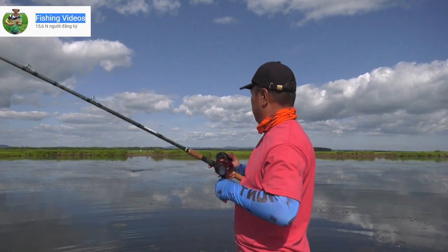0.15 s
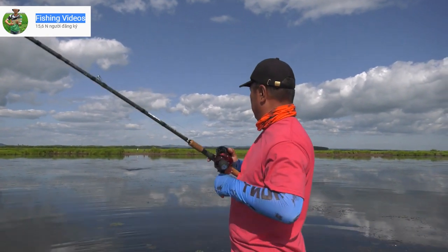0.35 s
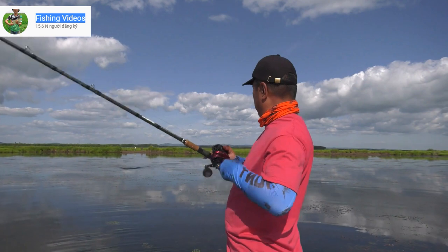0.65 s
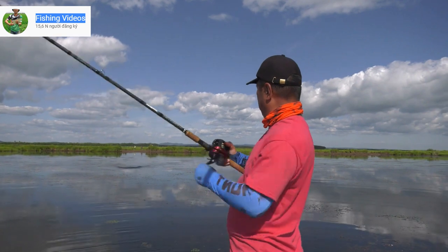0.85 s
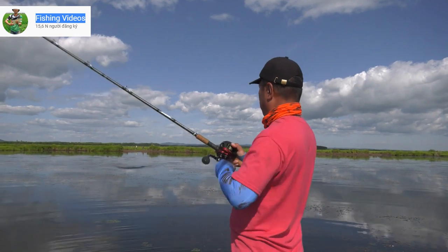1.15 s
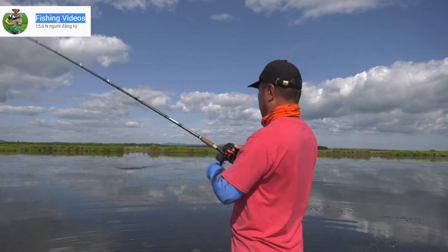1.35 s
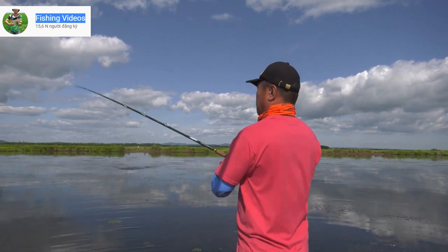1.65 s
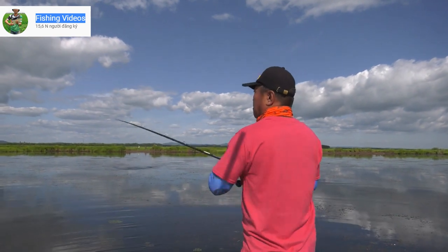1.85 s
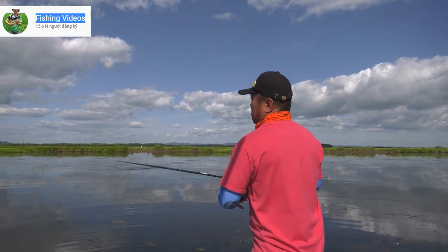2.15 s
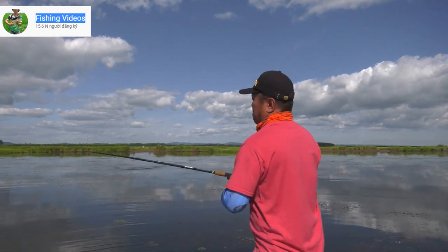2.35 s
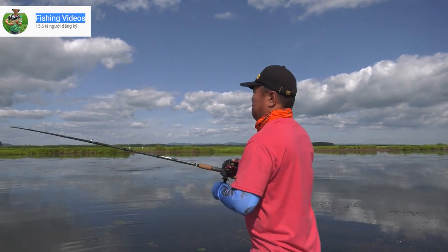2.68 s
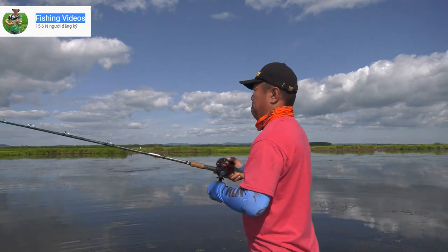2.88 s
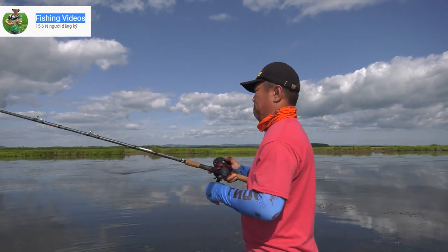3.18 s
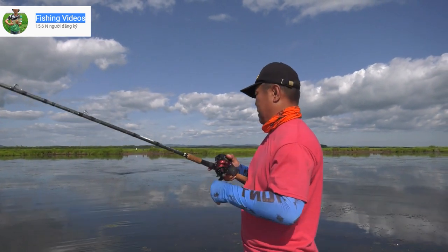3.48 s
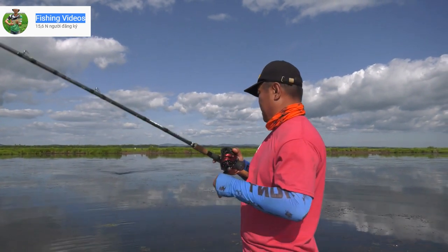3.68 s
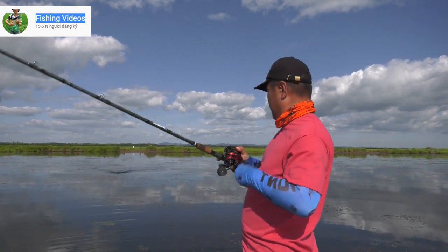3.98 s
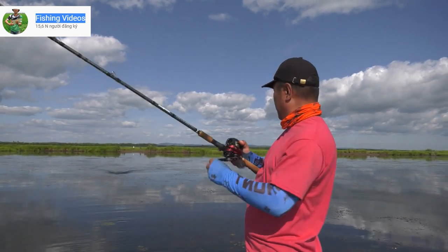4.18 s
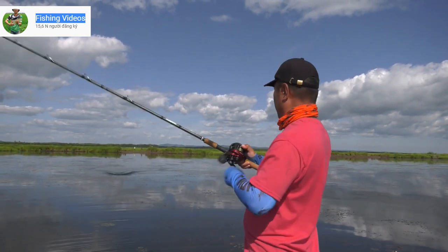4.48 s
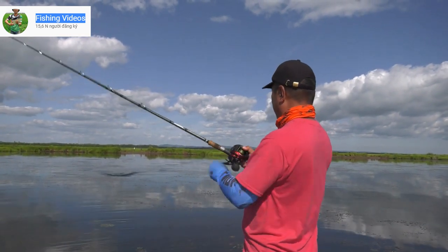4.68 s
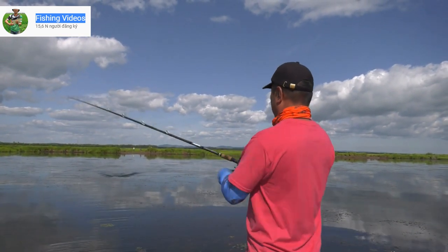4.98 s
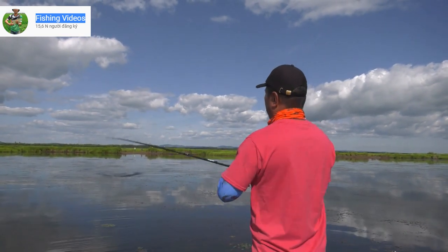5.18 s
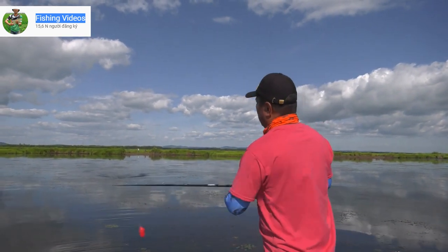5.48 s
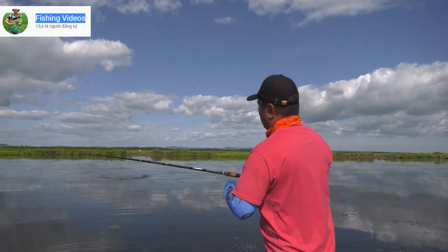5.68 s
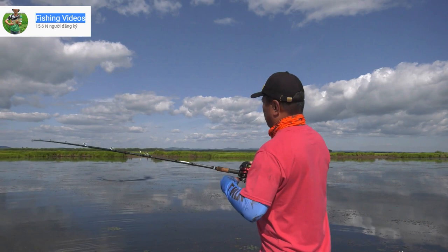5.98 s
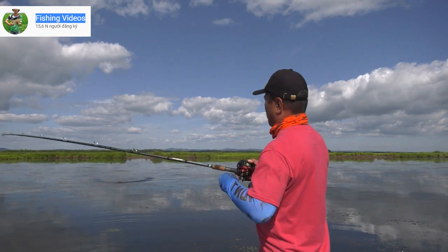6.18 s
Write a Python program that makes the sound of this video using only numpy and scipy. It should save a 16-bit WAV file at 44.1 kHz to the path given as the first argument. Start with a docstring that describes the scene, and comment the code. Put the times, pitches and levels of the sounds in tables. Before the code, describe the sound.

An angler's reel whirs in two short spells of quick handle pulls, each a grainy hiss with metallic clicks and thin line squeaks. Around them a pole bumps and rubs on a hollow wooden hull: a busy cluster first, a lighter patter midway, a sharp thump late. Quiet open water outdoors, faint airy wash, near sounds picked up closely with only a tiny short echo.

```python
"""Pole and fishing reel on a small boat

A small boat lies on still, open water. A wooden pole rubs and knocks on the hollow hull: slips and blows
set its wooden modes ringing. A fishing reel is wound mainly in two spells: each pull of the handle hisses
through guides and gears, made of grit noise and resonances. Ticks and squeaks are narrow bands of noise,
the ticks with a bright snap on top. A low wash of air and water, made of random spectra, lies under it all,
and the near sounds echo briefly.
"""
import sys
import numpy as np
from scipy import signal
from scipy.fft import rfft, irfft, next_fast_len
from scipy.io import wavfile
from scipy.ndimage import uniform_filter1d

SR = 44100
rng = np.random.default_rng(int(sys.argv[2]) if len(sys.argv) > 2 else 0)


def gain_from_db(level_db):
    """Turn a decibel level (scalar or array-like) into a linear amplitude factor."""
    decades = np.asarray(level_db, float) / 20
    return 10 ** decades


def bounce(signal):
    """Save signal as a 16-bit WAV file at the path given by the first command-line argument."""
    frames = np.transpose(np.atleast_2d(signal))
    limited = np.clip(frames, -1, 1)
    pcm = np.round(limited * 32767).astype(np.int16)
    wavfile.write(sys.argv[1], SR, pcm)


N = 279594  # length in samples

# Wash of air and far water. Each row: frequency in Hz, relative level in dB per Hz.
WASH_SPECTRUM = [(15, -70), (25, -31), (150, -5), (335, -6.5), (373, -6.5), (695, -5.5), (850, -9.5),
                 (1400, -15.5), (4870, -26.5), (16000, -29)]
WASH_DB = -60
# Likeness of the wash at left and right. Each row: frequency in Hz, correlation (held within -1 to 1).
WASH_LIKENESS = [(60, 0.29), (130, 0.89), (290, 0.79), (640, 0.83), (1410, 0.11), (3100, -0.98),
                 (6820, -0.19), (15000, -0.35)]

# Modes of hull and pole. Each row: frequency in Hz before tuning, relative level in dB,
# time to fall 60 dB in seconds before a ring factor shortens it.
HULL_MODES = [(96, -17.5, 0.42), (152, -13, 0.14), (201.6, -6, 0.1), (256.5, -6.5, 0.073),
              (312, 3.5, 0.021), (370.4, 2.5, 0.0076), (451, -6, 0.081), (677, 5, 0.044), (830, 7, 0.035),
              (1150, 7, 0.038), (1344, -0.5, 0.06), (1544, 6, 0.035), (1748, -12, 0.11),
              (2010, -5.5, 0.093), (2380, 8, 0.0074)]
UPPER_HZ = 600  # modes from here up count as upper modes
BRIGHTER_PER_HARD_DB = 0.45  # dB per octave that the upper modes tilt up for each dB of hardness
# The pole drags along the hull. Each row: middle in seconds, level in dB, time from the middle
# to 24 dB down in seconds, level of the soft bounces against the smooth drag in dB.
DRAGS = [(.05, -65, 0.34, 1), (0.259, -55, 0.16, 5), (0.433, -49, 0.1, -5), (0.602, -45, 0.044, -4.5),
         (0.844, -61, 0.94, -6.5), (1.175, -51, 0.13, -3.5), (1.506, -61.5, 0.18, -21),
         (1.916, -55.5, 0.62, -7.5), (2.133, -50.5, 0.098, 0.5), (3.48, -61.5, 0.42, -25),
         (4.31, -62, 0.68, -11), (5.545, -55, 0.14, 0), (5.845, -44, 0.046, -15), (6.303, -63, 0.38, -22)]
RESTING_DB = -86  # the pole never lies quite still
BOUNCES_PER_S, SOFT_HZ = 62, 1160  # typical bounce rate; a soft contact dulls the top above SOFT_HZ

# Tone of the reel's hiss. Each row: frequency in Hz, relative level in dB per Hz.
HISS_SPECTRUM = [(530, -7.5), (900, 1), (2390, -4.5), (3320, -12), (4720, -3), (7000, -15), (9100, -18),
                 (15400, -120)]
# Airy treble of the reel. Each row: frequency in Hz, relative level in dB per Hz.
AIR_SPECTRUM = [(3240, -6), (5500, -5), (7690, -5.5), (8300, -8.5), (10800, -9), (12500, -12),
                (16000, -24.5)]
# Gear and guide resonances. Each row: middle of the drifting pitch in Hz, width in Hz, relative level in dB.
GEARS = [(1176, 190, -4), (2183, 190, 0.5), (2490, 520, 0.5), (2960, 510, 2.5), (3610, 170, -3),
         (3745, 390, -2.5), (4240, 410, -2), (4800, 200, -3), (5200, 380, -6.5), (6280, 530, -8.5)]
# The angler turns, and his body shades the airy treble of the reel.
# Each row: time in seconds, level of that treble against the reel's body in dB.
SHADE = [(0, 1.5), (.9, -2), (1.9, -11), (2.9, -1), (3.8, 5.5), (4.2, -1), (5.1, -9), (6.34, -5)]
# Spells of steady winding, the line slides all the while.
# Each row: start in seconds, end in seconds, level in dB.
SPELLS = [(0.91, 1.61, -59.5), (3.402, 3.6, -78.5), (4.178, 4.82, -61), (6.2, 6.333, -71)]
RUN_UP_DB_PER_S, RUN_DOWN_DB_PER_S, IDLE_DB = 34.5, 23, -73.5
# Pulls on the reel handle. Each row: middle in seconds, level in dB.
PULLS = [(.908, -55), (1.043, -51), (1.171, -54.5), (1.32, -56), (1.432, -54.5), (1.57, -57.5),
         (1.696, -60), (1.892, -62), (3.724, -64.5), (3.948, -61.5), (4.127, -60), (4.247, -53.5),
         (4.402, -57), (4.527, -54), (4.666, -55), (4.784, -55.5), (4.934, -52.5), (5.066, -58.5),
         (5.288, -61.5),]
PULL_S, PULL_EDGE = 0.048, 3.66  # time from middle to 24 dB down; a pull holds, then stops rather abruptly
# Hard knocks stir a brief hiss; soft ones hardly any.
# Level against the knock in dB, time to 24 dB down in seconds, dB more per dB of hardness.
STIR_DB, STIR_S, STIR_PER_HARD_DB = -13.5, 0.02, 1.85

# The pole strikes the hull. Each row: start in seconds, peak of the low modes in dB, pitch of the plank
# struck in Hz, hardness in dB (the upper modes peak 9.5 dB above this, against the low ones).
KNOCKS = [(0.068, -46.5, 320, -6), (0.149, -43.5, 393, -9.5), (0.186, -38.5, 340, -7.5),
          (0.197, -42.5, 315, -28), (0.224, -47.5, 296, -11), (0.238, -38, 315, -20),
          (0.267, -31, 324, -16), (0.298, -35.5, 236, -8.5), (0.317, -36.5, 240, -25),
          (0.38, -35.5, 563.4, -16.5), (0.392, -30.5, 347, -9.5), (0.415, -38, 334, -17),
          (0.447, -40, 305, -10.5), (0.478, -45, 288, -17), (0.548, -25.5, 269, -24),
          (0.595, -34.5, 337, -27), (0.8, -38.5, 339, -17), (0.977, -36, 303, -18.5),
          (1.067, -41, 300, -20), (1.158, -24, 282, -12.5), (1.315, -38.5, 372, -34),
          (1.358, -47.5, 133, -35), (1.505, -39, 324, -18), (1.509, -24, 451, -23),
          (1.517, -32, 197.4, -23), (1.535, -35, 208, -26), (1.77, -44, 138, -26), (2.293, -36, 306, -14),
          (3.129, -42, 330, -24), (3.177, -41, 364, -14), (3.205, -40, 361, -15), (3.273, -40.5, 322, -15),
          (3.3621, -34, 299, -14), (3.368, -37.5, 315, -14.5), (3.369, -42.5, 139, -30),
          (3.402, -33, 310, -14), (3.4275, -31.5, 319, -19.5), (3.462, -31.5, 314, -14.5),
          (3.481, -47, 139, -23), (3.511, -31.5, 313, -17), (3.616, -39, 312, -37),
          (3.717, -46.5, 470, -1.5), (3.937, -36, 314, -14.5), (3.941, -42.5, 140, -36),
          (4.171, -33, 370, -22), (5.161, -41, 320, -20), (5.468, -47, 340, -30), (5.512, -43, 334, -29),
          (5.528, -39.5, 367, -20), (5.547, -50, 300, -24), (5.559, -45.5, 328, -13.5),
          (5.579, -41, 330, -23), (5.632, -47, 307, -34), (5.703, -41, 263, -27), (5.8203, -20, 398, -6.5)]

# Ticks of reel and line, and bright clicks on some knocks. Each row: start in seconds, peak of the ring
# in dB, pitch of the ring in Hz, brightness in dB (the snap peaks 11.5 dB above this against the ring,
# before its filter).
TICKS = [(0.2989, -33.5, 2800, -6.5), (0.331, -56, 7500, 6), (0.55, -47.5, 3020, -2.5),
         (0.5995, -42, 2940, -30), (0.9186, -35.5, 3020, -21), (0.9416, -35, 5100, -3),
         (0.9712, -32, 2960, 2), (1.0147, -40, 2160, -8), (1.2, -36, 2960, -37), (1.2294, -43.5, 2490, -32),
         (1.307, -52, 2940, -7), (1.331, -46, 4400, -2), (1.392, -41, 2600, -3), (1.4142, -53.5, 4660, 12),
         (1.4847, -36, 1930, -5), (1.509, -29, 4940, -28), (1.557, -58, 2240, 14),
         (2.3015, -47, 1510, -6.5), (2.532, -57, 1040, -25), (3.215, -58, 4000, -3),
         (3.303, -55, 2850, -14), (3.313, -57, 4300, 5), (3.336, -56, 2620, 2), (3.379, -48, 2500, -6),
         (3.4842, -52, 2650, -16), (3.719, -33.5, 1310, -9), (3.962, -43.5, 4600, -5),
         (4.235, -41, 3140, 1), (4.259, -42, 2960, 10), (4.2926, -46.5, 3010, 7), (4.3088, -34.5, 2100, 3),
         (4.488, -45, 6360, -20), (4.517, -47, 5000, -7), (4.5422, -39.5, 2960, -4),
         (4.5704, -41.5, 3700, -1), (4.611, -48, 3000, -3), (4.793, -40, 5270, -16),
         (4.8164, -41.5, 4860, 4), (4.84, -41, 2470, -25), (5.77, -53, 1190, -30), (5.677, -50, 2080, -29),
         (5.819, -35.5, 4870, -25), (6.0222, -50.5, 5200, -21), (6.175, -44, 1510, -6),
         (6.1897, -40.5, 2070, -1)]

# Squeaks of the line in its guides, mostly short, two long and faint. Each row: middle in seconds,
# level in dB, pitch at the middle in Hz, time from the middle to 24 dB down in seconds.
SQUEAKS = [(0.905, -50, 3010, 0.03), (1.046, -48.5, 2120, 0.044), (1.037, -48.5, 1220, 0.024),
           (1.34, -54.5, 4500, 0.013), (1.406, -53, 4760, 0.048), (1.573, -55.5, 2170, 0.063),
           (1.58, -49, 4570, 0.021), (1.695, -58, 2570, 0.041), (2.706, -75, 4700, 0.5),
           (4.263, -50, 3010, 0.027), (4.405, -54, 2800, 0.03), (4.49, -51.5, 4720, 0.0091),
           (4.505, -55, 2510, 0.036), (4.548, -53, 3020, 0.028), (4.647, -50, 4790, 0.027),
           (4.78, -56, 4530, 0.097), (5.895, -74, 4840, 0.29)]

# Lead of the left microphone port. Each row: frequency in Hz, lead in radians.
PORT_LEAD = [(60, 0.023), (1000, 0.022), (2000, 0.51), (3000, 0.21), (8600, 0.053), (9500, 0.91),
             (10900, 2.26), (16000, 2.3)]
# Lean between the ports. Each row: frequency in Hz, left minus right in dB.
PORT_LEAN = [(250, 0.86), (1400, 0.3), (8000, -0.8), (13000, -1)]


def evened(x):
    """Scales to rms 1."""
    return x / np.sqrt(np.mean(x ** 2) + 1e-20)


def read(points, hz):
    """Reads a spectrum on a logarithmic frequency axis."""
    f, value = np.transpose(points)
    return np.interp(np.log(hz + 1), np.log(f + 1), value)


def curve(rows):
    """Reads a control curve at every sample."""
    s, value = np.transpose(rows)
    return np.interp(np.arange(N) / SR, s, value)


def add(mix, s, sound):
    """Mixes a sound in at time s."""
    part = mix[round(s * SR):][:len(sound)]
    part += sound[:len(part)]


def coloured(x, gain):
    """Filters by a gain given as a function of Hz."""
    size = next_fast_len(N)
    spectrum = rfft(x, size) * gain(np.fft.rfftfreq(size, 1 / SR))
    return irfft(spectrum, size)[..., :N]


def grains(per_s, spread_db):
    """Random clicks of either sign; a few are large."""
    chance, sign, size = rng.random((N, 3)).T
    size_db = np.minimum(-spread_db * np.log(1 - size), 4 * spread_db)
    return (chance < per_s / SR) * np.sign(sign - 0.5) * gain_from_db(size_db)


def wander(seconds):
    """Slow chance of rms 1, smoothed twice and held for 16 samples at a time."""
    smooth = max(round(seconds * SR / 16), 2)
    slow = rng.standard_normal(N // 16 + 1)
    slow = uniform_filter1d(uniform_filter1d(slow, smooth), smooth)
    return np.repeat(evened(slow), 16)[:N]


def swell(s, db, length, size=N, edge=2):
    """Power of a sound that swells and fades; a larger edge gives a flatter top and steeper sides."""
    t = np.arange(0, size, 16) / SR
    away = np.minimum((abs(t - s) / length) ** edge, 9)
    return np.repeat(gain_from_db(2 * db - 48 * away), 16)[:size]  # doubled dB, as this is power


def resonate(x, hz, width_hz):
    """A steep resonance that follows the curve hz: shift down, smooth twice, shift back."""
    turn = np.exp(2j * np.pi * np.cumsum(hz) / SR)
    r = np.exp(-np.pi * width_hz / SR)
    smoothed = signal.lfilter([1], np.convolve([1, -r], [1, -r]), x / turn)
    return (turn * smoothed).real


def wash():
    """Air and far water: random short-time spectra in drifting patches."""
    frames, hz = N // 256 + 5, np.fft.rfftfreq(1024, 1 / SR)
    a, b, c, d, patches = rng.standard_normal((frames, 513, 5)).T
    patches = evened(uniform_filter1d(uniform_filter1d(patches, 12, 0), 14, 1))
    same = np.clip(read(WASH_LIKENESS, hz), -1, 1)[:, None]
    left = a + 1j * b
    right = same * left + np.sqrt(1 - same ** 2) * (c + 1j * d)
    spectra = np.array([left, right]) * gain_from_db(read(WASH_SPECTRUM, hz)[:, None] + 1.6 * patches)
    sound = signal.istft(spectra, nperseg=1024, noverlap=768)[1][:, :N]
    return gain_from_db(WASH_DB) * evened(sound)


def hull_ring(pitch_hz, hard_db, chance, quiet_db, reach=0.16, blow_s=0.00078, ring=0.9, hold_s=0.009):
    """The low mode nearest the plank's pitch is pulled onto it and rings most; a hard blow wakes the upper ones."""
    t = np.arange(SR // 6)[:, None] / SR
    hz, db, t60 = np.transpose(HULL_MODES)
    low = hz < UPPER_HZ
    hz[abs(np.log(hz / pitch_hz)).argmin()] = pitch_hz
    # other planks are quieter, by quiet_db at most
    near_db = -np.minimum(6 * (np.log(hz / pitch_hz) / reach) ** 2, quiet_db)
    place_db = np.where(low, near_db, 2.2 * np.roll(chance, 1))
    # each spot struck tunes the upper modes a little otherwise
    hz *= np.where(low, 1, 1 + 0.025 * np.roll(chance, 2))
    place_db += ~low * BRIGHTER_PER_HARD_DB * (hard_db - 4) * np.log2(hz / 1000)
    # the bass builds while the blow lasts
    rise = 1 - np.exp(-(t / np.where(low, blow_s, blow_s / 3.6)) ** 2)
    # the plank is driven until the pole bounces off, sooner if hard
    driven_s = np.where(low, hold_s * min(gain_from_db(-hard_db), 1), 0)
    free = np.maximum(t - driven_s, 0)
    fade = gain_from_db(db + place_db - 60 * free / (t60 * ring))
    phase = np.where(low, 0.85 + 0.11 * chance, 0.5 * chance)
    modes = fade * rise * np.sin(2 * np.pi * hz * t + phase)
    body, edge = modes[:, low].sum(1), modes[:, ~low].sum(1)
    return body / abs(body).max() + gain_from_db(hard_db) * edge / abs(edge).max()


def rubbing():
    """Uneven little slips of wood on wood excite the whole hull; quick soft bounces ring the plank below."""
    def dulled(x):
        return coloured(x, lambda hz: 1 / (1 + (hz / SOFT_HZ) ** 4))

    slips = grains(700, 2.5) * gain_from_db(2.2 * wander(0.015))
    turns = np.cumsum(BOUNCES_PER_S * gain_from_db(3 * wander(0.02))) / SR
    # one bounce at each whole turn
    bounces = np.diff(np.floor(turns), prepend=0) * gain_from_db(3 * rng.standard_normal(N))
    hull = hull_ring(300, 0.3, rng.standard_normal(len(HULL_MODES)), 3.6, reach=1.0, ring=0.62)
    plank = hull_ring(323, -25, rng.standard_normal(len(HULL_MODES)), 26,
                      reach=0.26, ring=0.35, hold_s=0.00093)
    drag = evened(dulled(signal.oaconvolve(slips, hull)[:N]))
    bouncing = evened(dulled(signal.oaconvolve(bounces, plank)[:N]))
    swells = np.array([swell(s, db, length) for s, db, length, _ in DRAGS])
    drag_power = gain_from_db(2 * RESTING_DB) + swells.sum(0)
    bounce_power = gain_from_db(2 * np.array(DRAGS)[:, 3]) @ swells
    return np.sqrt(drag_power) * drag + np.sqrt(bounce_power) * bouncing


def winding():
    """Power of the reel's hiss: spells run up, hold and run down, pulls swell, hard knocks stir it briefly."""
    t, power = np.arange(N) / SR, np.full(N, gain_from_db(2 * IDLE_DB))
    for start, end, db in SPELLS:
        run_up_db = RUN_UP_DB_PER_S * np.maximum(start - t, 0)
        run_down_db = RUN_DOWN_DB_PER_S * np.maximum(t - end, 0)
        power += gain_from_db(2 * (db - run_up_db - run_down_db))
    for s, db, _, hard_db in KNOCKS:
        stir_db = db + STIR_DB + STIR_PER_HARD_DB * hard_db  # soft knocks stir hardly any hiss
        add(power, s, swell(STIR_S / 2, stir_db, STIR_S, size=SR // 10))
    return power + sum(swell(s, db, PULL_S, edge=PULL_EDGE) for s, db in PULLS)


def reel():
    """Grit hisses broadly; rattling clicks set the gear and guide resonances flickering and drifting."""
    grit = evened(grains(3500, 3.85)) + 0.47 * rng.standard_normal(N)
    hiss = evened(coloured(grit, lambda hz: gain_from_db(read(HISS_SPECTRUM, hz))))
    air = evened(coloured(grit, lambda hz: gain_from_db(read(AIR_SPECTRUM, hz))))
    whine = np.zeros(N)
    for hz, width_hz, db in GEARS:
        rattle = grains(1800, 2.2) * gain_from_db(3 * wander(0.006) + 2.2 * wander(0.05))
        drifting_hz = hz * gain_from_db(0.21 * wander(0.044))
        whine += evened(resonate(rattle, drifting_hz, width_hz)) * gain_from_db(db)
    body = evened(hiss + 1.5 * evened(whine))
    stutter = evened(gain_from_db(1.2 * wander(0.004)))  # the line catches and lets go
    return np.sqrt(winding()) * stutter * (body + gain_from_db(curve(SHADE)) * air)


def knocks(crack_db=-7, crack_t60=0.031, push_db=9, push_s=0.00038):
    """The pole strikes the hull; the contact itself gives one sharp push and cracks briefly."""
    out, cracks, t = np.zeros(N), np.zeros(N), np.arange(3000) / SR
    u = np.arange(SR // 6) / SR / push_s
    push = np.e * u * (2 - u) * np.exp(-u)
    crack_rise = 1 - np.exp(-t / 0.00062)
    chances = rng.standard_normal((len(KNOCKS), len(HULL_MODES) + len(t)))
    for (s, db, hz, hard_db), chance in zip(KNOCKS, chances):
        mode_chance, noise = np.split(chance, [len(HULL_MODES)])
        quiet_db = np.clip(1.2 * (-17 - db), 6, 18)  # a heavy blow shakes every plank
        ring = gain_from_db(db) * hull_ring(hz, hard_db + 9.5, mode_chance, quiet_db)
        add(out, s, ring + gain_from_db(db + min(hard_db, -13) + push_db) * push)
        crack_fade = gain_from_db(db + hard_db + crack_db - 60 * t / crack_t60)
        add(cracks, s, crack_fade * noise * crack_rise)
    return out + coloured(cracks, lambda hz: 1 / (1 + (hz / 6500) ** 2) / (1 + (1500 / (hz + 1)) ** 4))


def ticks(ring_t60=0.019, snap_t60=0.0045, ring_width_hz=1600, rise_s=0.00042):
    """Ticks of reel and line, and bright clicks on some knocks: a short ring and a bright, wide snap."""
    rings, snaps, t = np.zeros(N), np.zeros(N), np.arange(1500) / SR
    rise = 1 - np.exp(-(t / rise_s) ** 2)
    for (s, db, hz, snap_db), noise in zip(TICKS, rng.standard_normal((len(TICKS), len(t)))):
        ring = resonate(noise * gain_from_db(-60 * t / ring_t60) * rise, np.full(len(t), hz), ring_width_hz)
        snap = noise[::-1] * gain_from_db(-60 * t / snap_t60) * rise
        add(rings, s, gain_from_db(db) * ring / abs(ring).max())
        add(snaps, s, gain_from_db(db + snap_db + 11.5) * snap / abs(snap).max())
    return rings + coloured(snaps, lambda hz: 1 / (1 + (hz / 11500) ** 12) / (1 + (4500 / (hz + 1)) ** 4))


def squeaks(width_hz=200, climb=0.058):
    """Rough whistles, mostly short, two long and faint: fluttering noise in a resonance that climbs as the
    line tightens."""
    t, out = np.arange(N) / SR, np.zeros(N)
    for s, db, hz, length in SQUEAKS:
        flutter = rng.standard_normal(N) * gain_from_db(2.2 * wander(0.017))
        climbing_hz = hz * (1 + climb * np.tanh((t - s) / length))
        # longer squeaks are wider in pitch
        whistle = evened(resonate(flutter, climbing_hz, width_hz * (1 + 5 * length)))
        out += np.sqrt(swell(s, db, length, edge=3)) * whistle
    return out


def boat_echo(x, t60=0.027, level_db=-16):
    """Short scattered reflections off hull and water, other ones at each side."""
    slots = np.arange(60, SR // 6, 22)
    t = slots + rng.integers(0, 22, (2, len(slots)))  # in samples
    taps = np.zeros((2, SR // 5))
    np.put_along_axis(taps, t, rng.choice([-1., 1.], t.shape) * gain_from_db(-60 * t / SR / t60), 1)
    echo = signal.oaconvolve(x[None], taps / np.linalg.norm(taps[0]), axes=1)[:, :N]

    def scatter(hz):  # short waves scatter most
        return gain_from_db(level_db + 17 * np.tanh(hz / 9000) ** 2) / (1 + (450 / (hz + 1)) ** 2)

    return coloured(echo, scatter)


def scene():
    """Near sounds reach the two microphone ports with a small lead and lean that change with pitch."""
    near = knocks() + rubbing() + reel() + squeaks() + ticks()
    side = np.array([[0.5], [-0.5]])  # left, right

    def port_gain(hz):
        lead = (side + 0.5) * read(PORT_LEAD, hz)  # only the left port is shifted
        return gain_from_db(side * read(PORT_LEAN, hz)) * np.exp(1j * lead)

    return coloured(near, port_gain) + boat_echo(near) + wash()


def low_pass(x):
    """Removes everything above the highest recorded frequency."""
    return signal.sosfilt(signal.butter(12, 16430, fs=SR, output="sos"), x)


def record(dry):
    """Limits the band to below about 15.9 kHz, then applies the microphone's bass cut at 88 Hz."""
    band_limit = signal.firwin(511, 15900, window=("kaiser", 9), fs=SR)
    limited = signal.oaconvolve(dry, band_limit[None], "same")
    bass_cut = signal.butter(3, 88, "high", fs=SR, output="sos")
    finished = signal.sosfilt(bass_cut, limited)
    return low_pass(finished)


dry = scene()
out = record(dry)
bounce(out)
```